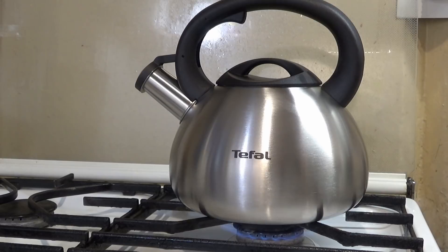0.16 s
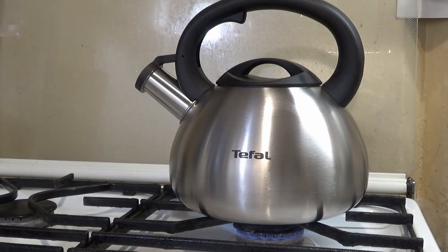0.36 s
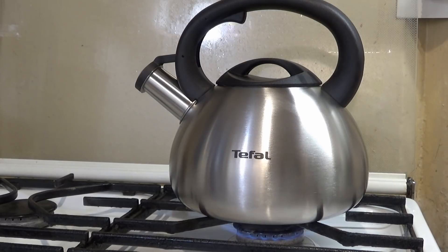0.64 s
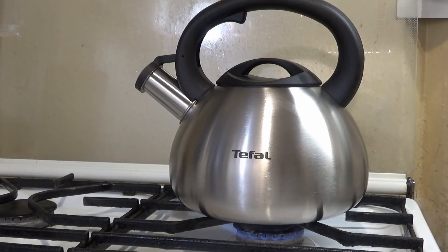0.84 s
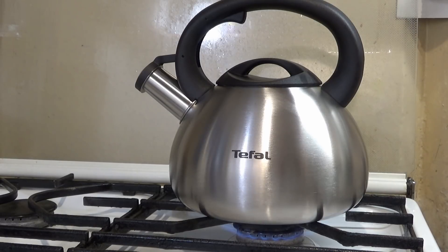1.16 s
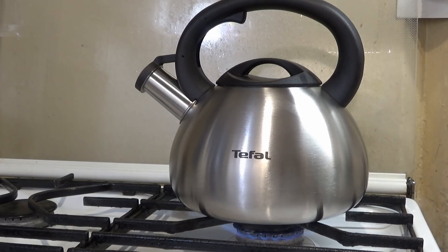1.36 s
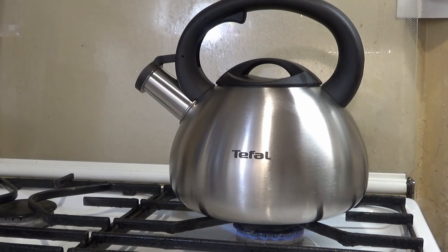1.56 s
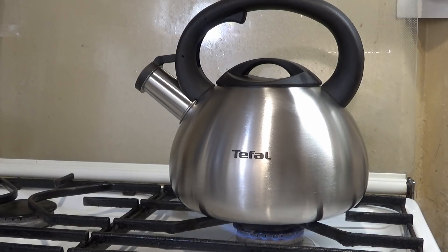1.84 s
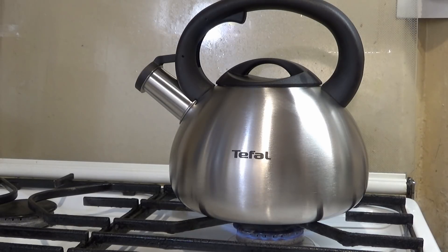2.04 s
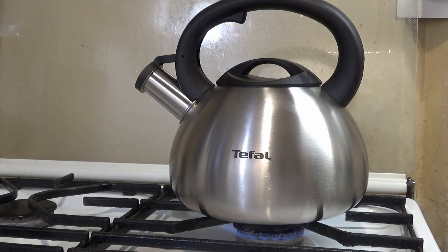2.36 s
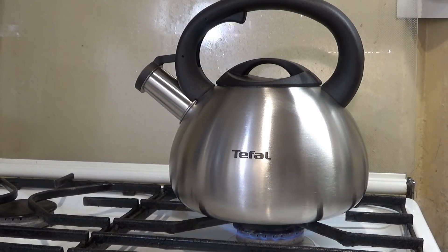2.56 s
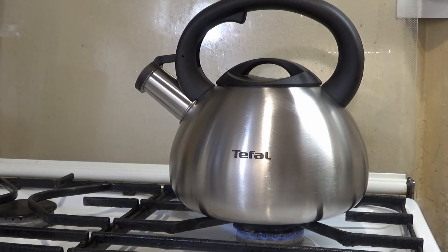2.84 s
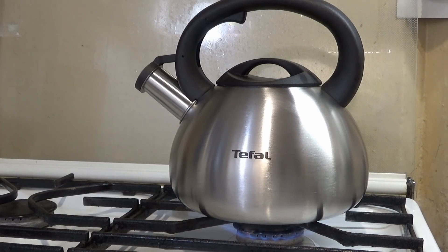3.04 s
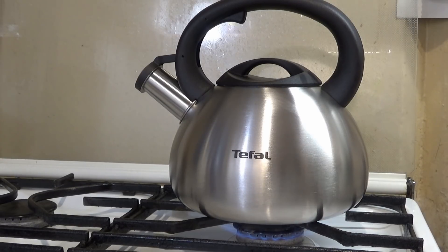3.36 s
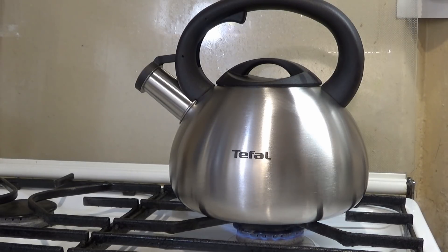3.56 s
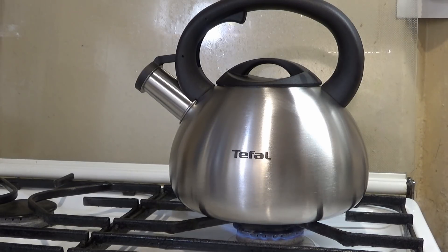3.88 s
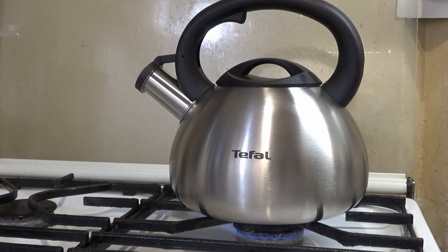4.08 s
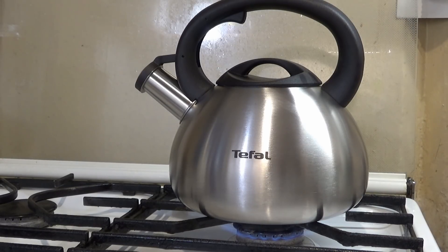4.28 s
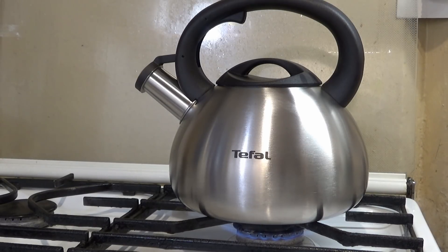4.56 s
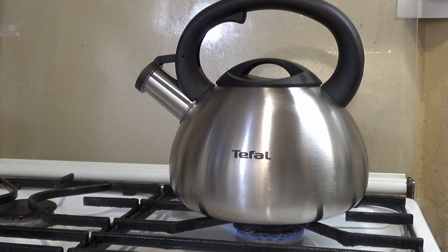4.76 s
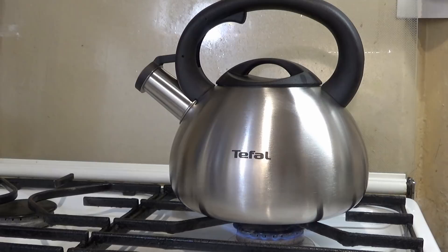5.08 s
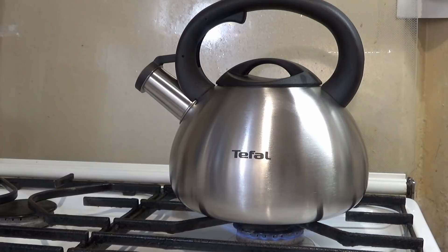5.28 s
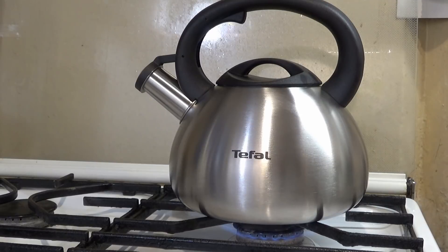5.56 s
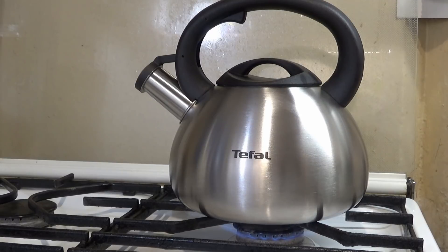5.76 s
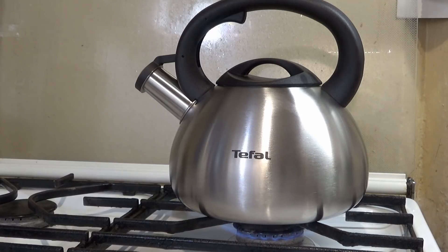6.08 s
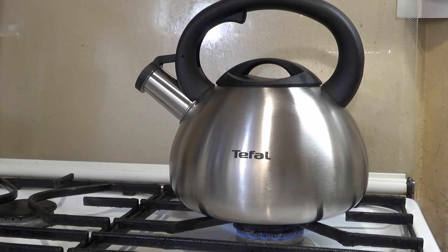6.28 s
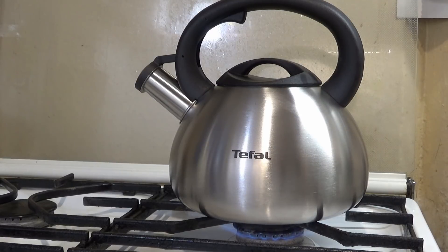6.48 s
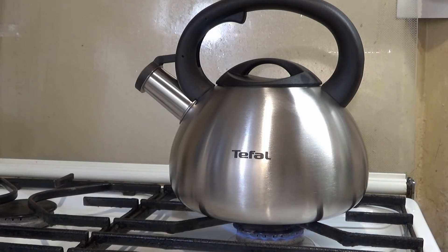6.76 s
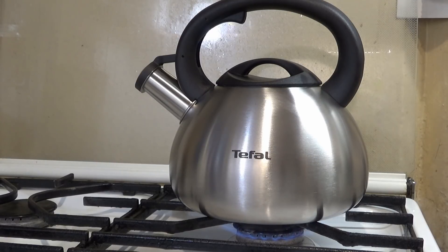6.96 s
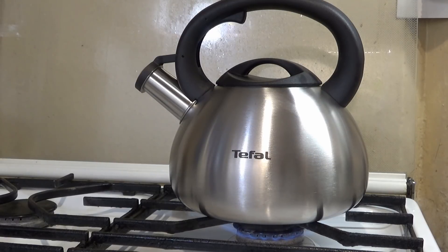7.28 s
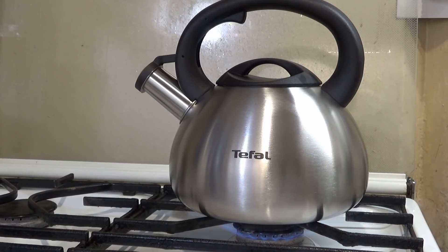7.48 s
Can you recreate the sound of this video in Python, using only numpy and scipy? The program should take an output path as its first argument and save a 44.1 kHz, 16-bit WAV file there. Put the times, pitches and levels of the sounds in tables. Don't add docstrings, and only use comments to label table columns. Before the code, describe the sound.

A steel kettle at full boil on a gas ring whistles from 0 to about 7.6 seconds without a pause. The piercing tone sits near 1.9 kHz with an equally prominent octave and thinner overtones above. It wavers constantly, with quick upward chirps and small dips; clear upward surges come near 1, 2.35, 3.1, 5.05 and 7.25 seconds, and a sag around 2.2. Brief roughness colours the onset and moments near 3.3, 5.9, 7.1 and the end. Tiny breaks in the lower tone occur near 0.65, 4.5 and 5.35. Airy steam hiss follows the jet, while flame and boil rumble softly underneath with a very faint mains hum. Close, hard kitchen walls add fluttering echo and a short ringing tail. The close microphone slightly compresses the steady loudness; the sound cuts off still whistling.

```python
import sys
import numpy as np
from scipy import signal
from scipy.fft import rfft, irfft, next_fast_len
from scipy.io import wavfile
from scipy.ndimage import uniform_filter1d

SR = 44100
rng = np.random.default_rng(int(sys.argv[2]) if len(sys.argv) > 2 else 0)


def file_out(sig):
    cols = np.atleast_2d(sig).T
    lim = np.clip(cols, -1, 1)
    pcm = np.round(lim * 32767).astype(np.int16)
    wavfile.write(sys.argv[1], SR, pcm)


def natural_amplitude(level_db):
    exponent = np.asarray(level_db, float) / 20
    return 10 ** exponent


N = 336483
TIME = np.arange(N) / SR
MID_PITCH_HZ = 1880


def rms_one(x):
    return x / np.sqrt(np.mean(np.abs(x) ** 2) + 1e-20)


def at_hz(points, hz, column=1):
    points = np.array(points)
    return np.interp(np.log(hz + 1), np.log(points[:, 0]), points[:, column])


def drift(rate_hz):
    r = np.exp(-8 * np.pi * rate_hz / SR)
    noise = rng.standard_normal(N // 4 + 5002)
    slow = signal.lfilter([1], [1, -2 * r, r * r], noise)[5000:]
    return rms_one(np.interp(np.arange(N) / 4, np.arange(len(slow)), slow))


def lagged(x, rate_hz):
    r = np.exp(-2 * np.pi * rate_hz / SR)
    return signal.filtfilt([1 - r], [1, -r], x)


def bumps(rows):
    coarse = TIME[::16]
    total = np.zeros(len(coarse))
    for s, height, ms in rows:
        total += height * np.exp(-.5 * ((coarse - s) * 1000 / max(ms, 1)) ** 2)
    return np.interp(TIME, coarse, total)


# t/s, f/Hz
PRESSURE_TREND = [(0.0, 1845), (0.45, 1850), (0.9, 1891), (1.35, 1867), (1.8, 1910), (2.24, 1790),
                  (2.69, 1853), (3.14, 1808), (3.59, 1903), (4.04, 1917), (4.49, 1860), (4.94, 1909),
                  (5.39, 1859), (5.83, 1929), (6.28, 1879), (6.73, 1979), (7.18, 1847), (7.63, 1895)]
# t/s, swing/Hz, width/ms
BOIL_SURGES = [(0.264, -32, 56), (0.595, -36.5, 13.8), (0.96, 94.5, 25.4), (1.135, -44, 22.2),
               (2.08, -22, 22.6), (2.352, 58, 47), (2.763, -41, 47.3), (3.106, 73.5, 21), (3.185, 42, 20.4),
               (3.407, -33, 18.7), (3.657, 33.5, 17), (3.769, 40.5, 17.7), (3.958, 59.5, 26),
               (4.13, 50.5, 16), (4.205, 39, 22.5), (4.299, 49, 22.3), (4.586, 31, 24.7),
               (4.976, 66.5, 19.5), (5.062, 107, 32.2), (5.257, 34, 57.6), (5.392, -38.5, 22),
               (5.711, 54, 19), (5.896, -77.5, 14.3), (6.032, 49.5, 24.5), (6.175, -32.5, 68.4),
               (6.349, 48, 20.8), (6.584, -35, 46), (6.925, 41, 33), (7.261, 91.5, 25)]
# t/s, jump/Hz, width/ms
BUBBLE_FLICKS = [(0.187, 47.5, 11.5), (0.486, -42.5, 8), (0.806, -34.5, 7.9), (1.287, -33, 16),
                 (1.35, 54, 9.9), (1.412, 38.5, 11.8), (1.527, -62.5, 5.7), (1.541, 122.5, 6.7),
                 (1.75, 63, 5.2), (1.791, -47, 7.4), (1.887, -48.5, 12), (2.025, 64.5, 8),
                 (2.422, 48.5, 8.6), (2.48, -45, 8.1), (2.595, 38.5, 7.1), (3.002, -30.5, 11),
                 (3.351, 53.5, 6.2), (3.526, 48, 12.4), (3.714, 78, 6.6), (4.411, 53, 6.45),
                 (4.704, 40, 10), (4.74, 55.5, 7.5), (4.791, 42, 6), (5.054, -63.5, 10.4),
                 (5.531, 56.5, 12.3), (7.079, 47.5, 5.3), (7.202, 45.5, 8.9), (7.492, 43, 8),
                 (7.533, 48.5, 7.2)]


def pressure():
    bubbles_per_s, bubbling_hz, flick_gain = 28, 6, 1.15
    shake = drift(bubbles_per_s)
    shake = rms_one(shake - uniform_filter1d(shake, size=6000))
    trend_s, trend_hz = np.transpose(PRESSURE_TREND)
    pitch_hz = np.interp(TIME, trend_s, trend_hz)
    return pitch_hz + bumps(BOIL_SURGES) + flick_gain * bumps(BUBBLE_FLICKS) + bubbling_hz * shake


# f/Hz, fundamental level re jet/dB
SPOUT_RESPONSE = [(1790, -2), (1820, -9), (1845, -8.5), (1872, -7.5), (1912, -5.5), (1945, -5), (1990, -3)]
# multiple of note, level re jet/dB
JET_OVERTONES = [(2, 2), (3, -12), (4, -14), (5, -20), (6, -25), (7, -31.5), (8, -37.5)]
# multiple of note, level re jet/dB
WOBBLE_LINES = [(1.62, -44), (2.352, -57), (2.65, -35.5), (3.352, -44), (3.65, -56), (4.35, -73),
                (5.65, -59)]
# t/s, swell/dB, width/ms
WOBBLE_SWELLS = [
    (.05, 16, 16),
    (.9, 7, 31),
    (3.31, 20.5, 16),
    (5.9, 14, 28.7),
    (7.07, 17, 20),
    (7.55, 13.5, 35),
]
# t/s, dip/dB, width/ms
DROPLET_BREAKS = [(.2, -13, 3.8), (.66, -25, 2.4), (1.28, -6, 0.71), (1.335, -4, 5.7), (1.845, -3, 0.6),
                  (4.125, -2, 2.2), (4.47, -30, 7.3), (4.635, -1, 8.1), (5.345, -20, 7.4), (6.02, -4, 5.9),
                  (6.41, -1, 1.5), (6.62, -6.5, 1.9), (7.12, -10, 6.8)]
# t/s, phase/rad
PHASE_SLIPS = [
    (1.28, 1.8),
    (1.845, 3.07),
    (5.345, 1.3),
    (6.41, 0.54),
    (6.62, 4.1),
]


def whistle(pitch_hz):
    jet_db = -16.5 + 0.23 * drift(9.8)
    quiver = drift(69.0)
    quiver = rms_one(quiver - uniform_filter1d(quiver, size=2000))
    quiver_hz = 10.0 * quiver + 3.63 * drift(301.0)
    cycle = 2 * np.pi * np.cumsum(pitch_hz + quiver_hz) / SR

    slip = sum(radians / 2 * np.tanh((TIME - s) / 0.0009) for s, radians in PHASE_SLIPS)
    fundamental_db = at_hz(SPOUT_RESPONSE, lagged(pitch_hz, 54.0)) + drift(24.0)
    fundamental_db = fundamental_db + bumps(DROPLET_BREAKS) + 1.35 * drift(80.0)
    note = natural_amplitude(fundamental_db) * np.sin(cycle + slip)

    jet_hz = lagged(pitch_hz, 45.0)
    faster_hz = jet_hz - MID_PITCH_HZ
    starved_db, starves_hz, starves_over_hz = -5, 1847, 10.5
    octave_loss_db = starved_db / (1 + np.exp((jet_hz - starves_hz) / starves_over_hz))
    for multiple, level_db in JET_OVERTONES:
        if multiple == 2:
            level_db = level_db + octave_loss_db
        if multiple > 6:
            level_db = level_db + .005 * multiple * faster_hz
        flutter_db = .45 * multiple * drift(80.0)
        note += natural_amplitude(level_db + flutter_db) * np.sin(multiple * cycle)

    wobble_db_per_hz = -0.08
    wander = rms_one(drift(74.0) + 1j * drift(130.0))
    loose = natural_amplitude(4.4 * drift(6.0) + wobble_db_per_hz * faster_hz) * wander
    locked = (natural_amplitude(bumps(WOBBLE_SWELLS)) - 1) * np.exp(1.5j * drift(30.0))
    wobble = loose + locked
    size, angle = np.abs(wobble), np.angle(wobble)
    for multiple, level_db in WOBBLE_LINES:
        note += natural_amplitude(level_db) * size * np.cos(multiple * cycle + angle)
    return np.sqrt(2) * natural_amplitude(jet_db) * note


# f/Hz, level/dB
WALL_ECHO = [(1000, -130), (1900, -1.5), (3800, -22.5), (5700, -5), (9000, -10), (16000, -6)]
# f/Hz, t60/s, level alike at both ears/dB, level apart/dB
ROOM_TAIL = [(500, 0.3, -37, -20), (2050, 0.94, -12.5, -19), (4150, 0.28, -6, -22.5),
             (5660, 0.5, -4.5, -15), (7780, 0.1, 6, -6), (16000, 0.28, 4, -6)]


def kitchen(x):
    wall_gap_ms, wall_loss_db = 14.11, -9.5
    size = next_fast_len(N + SR)
    hz = np.fft.rfftfreq(size, 1 / SR)
    trip = np.exp(-2j * np.pi * hz * wall_gap_ms / 1000)
    flutter = 1 + natural_amplitude(at_hz(WALL_ECHO, hz)) * trip / (1 - natural_amplitude(wall_loss_db) * trip)

    tails = np.zeros((2, len(hz)), complex)
    t60_s = at_hz(ROOM_TAIL, hz)
    for k, lag_s in enumerate(rng.uniform(.009, .035, 20)):
        echo = np.exp(-lag_s * (np.log(1000) / t60_s + 2j * np.pi * hz))
        tails[k % 2] += (-1) ** (k // 2) * echo / (1 - echo) / 4
    shared = natural_amplitude(at_hz(ROOM_TAIL, hz, column=2)) * tails[0]
    apart = natural_amplitude(at_hz(ROOM_TAIL, hz, column=3)) * tails[1]
    response = flutter + shared + apart * np.array([[1], [-1]])
    return irfft(rfft(x, size) * response, size)[:, :N]


# f/Hz, correlation
EAR_LIKENESS = [(30, .8), (300, .84), (700, .86), (1500, .96), (2500, .99), (9000, .985), (13500, .8)]


def banded_noise(spectrum, low_hz, count, patchy_db):
    size = next_fast_len(N)
    colour = natural_amplitude(at_hz(spectrum, np.fft.rfftfreq(size, 1 / SR)))
    tinted = irfft(rfft(rng.standard_normal((2, 2, size))) * colour, size)[..., :N]
    together = natural_amplitude(patchy_db * 0.4 * drift(19.0))
    flicker = natural_amplitude(patchy_db * drift(22.0))
    edges = low_hz * 2 ** (np.arange(count + 1) / 3)
    out = np.zeros((2, N))
    for k, (low, high) in enumerate(zip(edges, edges[1:])):
        band = signal.butter(2, [low, high], "band", fs=SR, output="sos")
        mid, side = signal.sosfilt(band, tinted[k % 2])
        alike = np.clip(at_hz(EAR_LIKENESS, np.sqrt(low * high)), -1, 1)
        gain = together * np.roll(flicker, k * 9001)
        out += gain * (np.sqrt(1 + alike) * mid + np.sqrt(1 - alike) * side * [[1], [-1]])
    return rms_one(out)


# f/Hz, density/dB per Hz
STEAM_SPECTRUM = [(1200, -16.5), (2200, -7.5), (2700, -17), (3350, -15), (4150, -1.5), (4650, -10.5),
                  (5200, -2.5), (6150, -7), (7100, 1.5), (8000, -3.5), (8700, -4), (10500, -6.5),
                  (13500, -14), (16000, -22)]


def steam(faster_hz):
    hiss_db, split_hz = -34.5, 4100
    dull_db_per_hz, bright_db_per_hz = 0.0111, -0.0261
    hiss = banded_noise(STEAM_SPECTRUM, 1106, count=12, patchy_db=1.98)
    dull = signal.sosfilt(signal.butter(2, split_hz, "low", fs=SR, output="sos"), hiss)
    bright = signal.sosfilt(signal.butter(2, split_hz, "high", fs=SR, output="sos"), hiss)
    both = natural_amplitude(dull_db_per_hz * faster_hz) * dull - natural_amplitude(bright_db_per_hz * faster_hz) * bright
    return natural_amplitude(hiss_db) * both


def air(faster_hz):
    above_hz, level_db, db_per_hz = 12000, -47, .03
    noise = rng.standard_normal(N) + .35 * rng.standard_normal((2, N))
    high = signal.butter(2, above_hz, "high", fs=SR, output="sos")
    thin = rms_one(signal.sosfilt(high, noise))
    return thin * natural_amplitude(level_db + db_per_hz * faster_hz + 1.5 * drift(15.0))


# f/Hz, width/Hz, level/dB
SHELL_MODES = [(186, 13, -8.5), (283, 28, -10), (360, 12, -1), (461, 9.7, 3.5), (562, 13, -4.5),
               (601, 8.4, 6)]


def shell(x, level_db):
    out = x.copy()
    for hz, width_hz, mode_db in SHELL_MODES:
        r = np.exp(-np.pi * width_hz / SR)
        poles = [1, -2 * r * np.cos(2 * np.pi * hz / SR), r * r]
        out += natural_amplitude(level_db + mode_db) * signal.lfilter([1 - r, 0, r - 1], poles, x)
    return rms_one(out)


# f/Hz, density/dB per Hz
BOIL_SPECTRUM = [(24, -42), (40, -6), (70, -14.5), (96, -3), (145, -7.5), (191, 0), (350, -5), (383, -8),
                 (460, -5), (511, -6.5), (551, -4.5), (661, -9), (1500, -11), (1950, -50), (3300, -120)]
# t/s, level/dB, width/ms
BOIL_THUMPS = [
    (2.95, 2.5, 37),
    (4.1, -1.5, 70),
    (4.75, 1.5, 80),
    (7.62, 3, 81),
]


def boil(faster_hz):
    level_db, db_per_hz, lag_hz = -47.5, -0.0166, 3
    boil_db = level_db + db_per_hz * lagged(faster_hz, lag_hz) + bumps(BOIL_THUMPS)
    noise = banded_noise(BOIL_SPECTRUM, 24.3, count=18, patchy_db=0.1)
    return natural_amplitude(boil_db) * shell(noise, level_db=-3.0)


def appliance_hum():
    hum_hz, level_db = 100, -65
    return np.sqrt(2) * natural_amplitude(level_db + 2.0 * drift(13.0)) * np.sin(2 * np.pi * hum_hz * TIME)


def scene():
    pitch_hz = pressure()
    faster_hz = pitch_hz - MID_PITCH_HZ
    balance_db = np.array([[-.3], [.3]])
    note = kitchen(whistle(pitch_hz)) * natural_amplitude(balance_db)
    hiss = steam(lagged(faster_hz, 9.2)) + air(lagged(faster_hz, 8.0))
    return note + hiss + boil(faster_hz) + appliance_hum()


def gain_control(x, above_db, share, speed_hz):
    r = np.exp(-2 * np.pi * speed_hz / SR)
    power = np.mean(x ** 2, axis=0)
    power = signal.lfilter([1 - r], [1, -r], power, zi=[natural_amplitude(2 * above_db)])[0]
    excess_db = np.maximum(10 * np.log10(power) - above_db, 0)
    return x * natural_amplitude(-share * excess_db)


def low_pass(x):
    return signal.sosfilt(signal.butter(12, 15780, fs=SR, output="sos"), x)


def record(dry):
    mic_noise_db, cutoff_hz = -68, 16050
    held = gain_control(dry, above_db=-14, share=0.41, speed_hz=30.8)
    mic_noise = rng.standard_normal(N) + .3 * rng.standard_normal((2, N))
    noisy = held + natural_amplitude(mic_noise_db) * mic_noise
    top_cut = signal.cheby2(16, 40, cutoff_hz, fs=SR, output="sos")
    return low_pass(signal.sosfilt(top_cut, noisy))


dry = scene()
out = record(dry)
file_out(out)
```